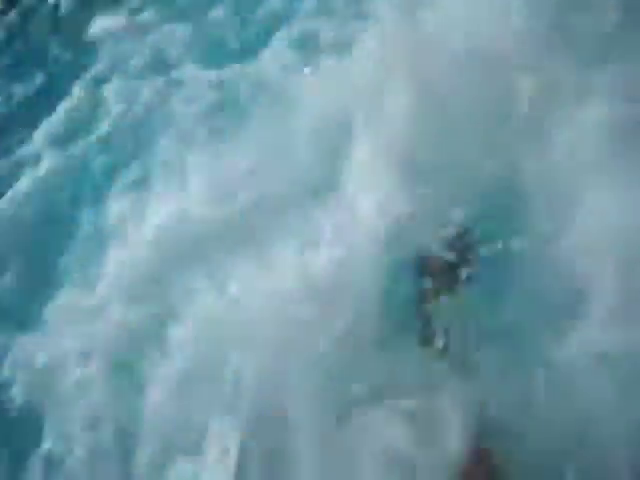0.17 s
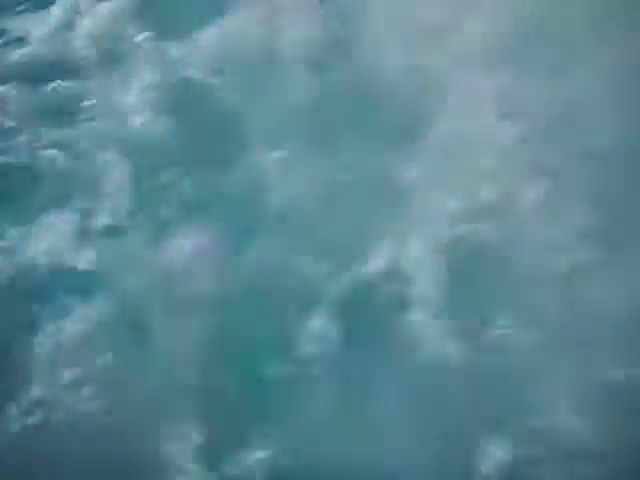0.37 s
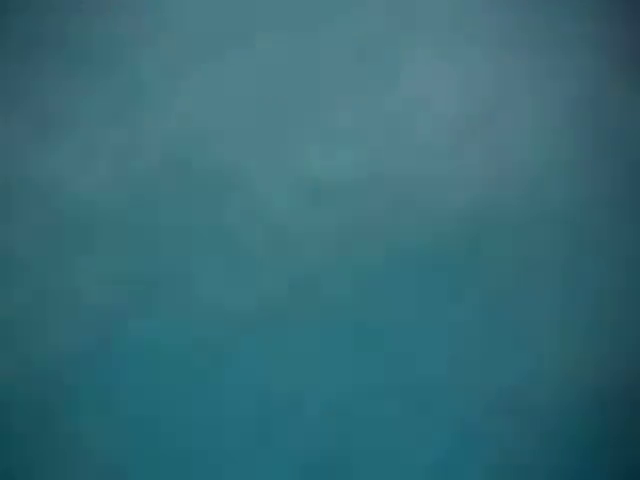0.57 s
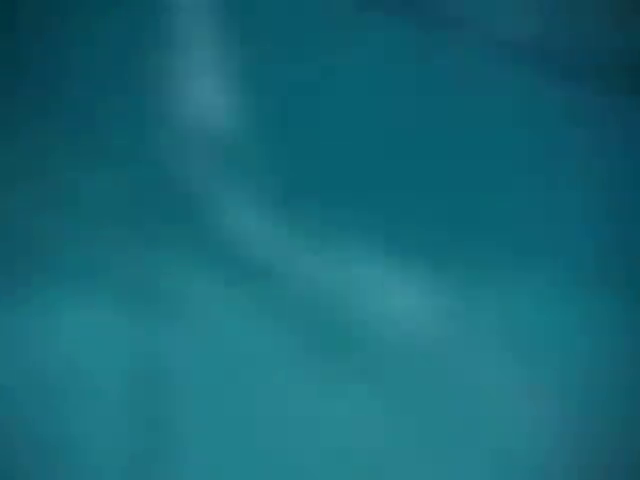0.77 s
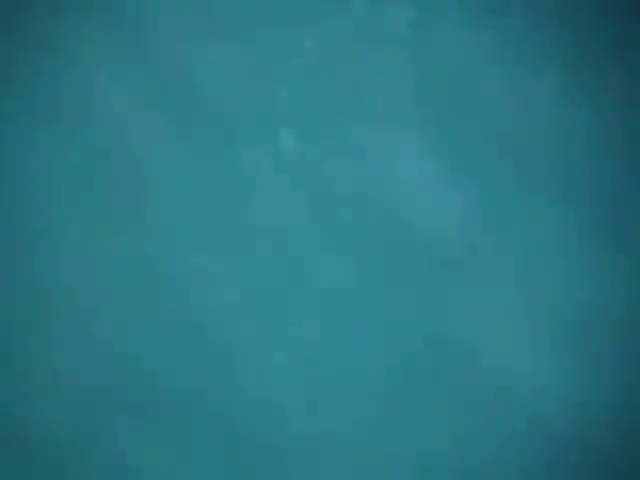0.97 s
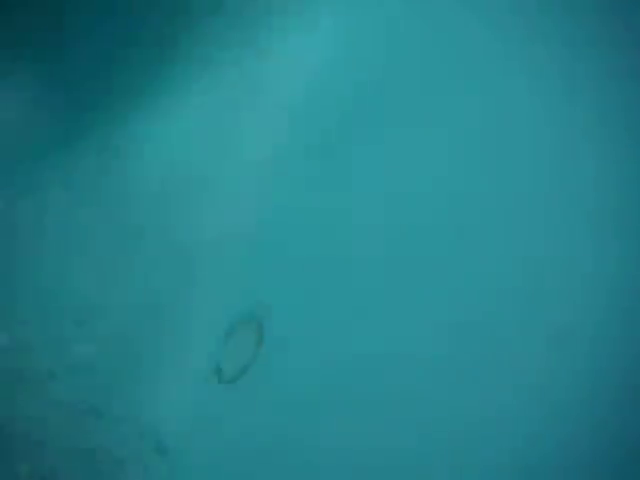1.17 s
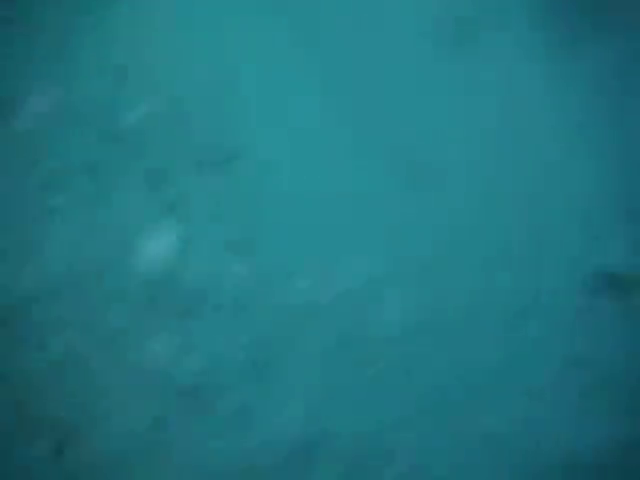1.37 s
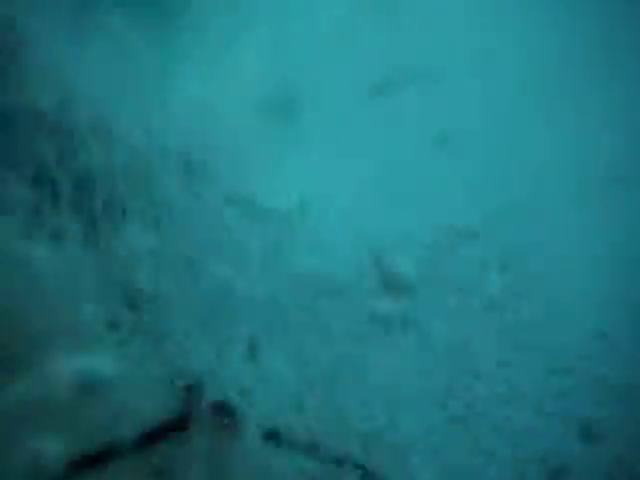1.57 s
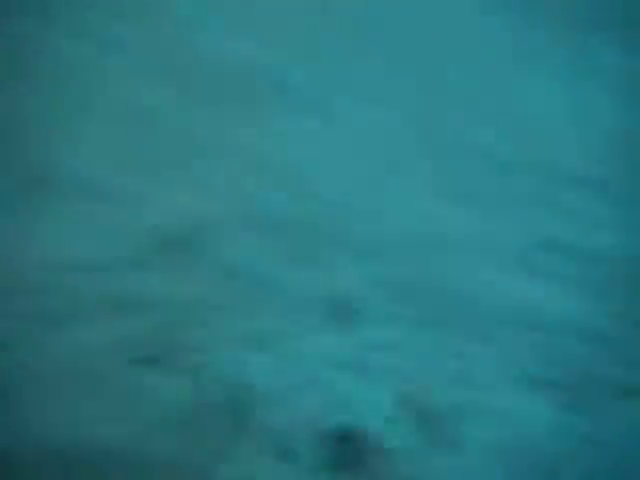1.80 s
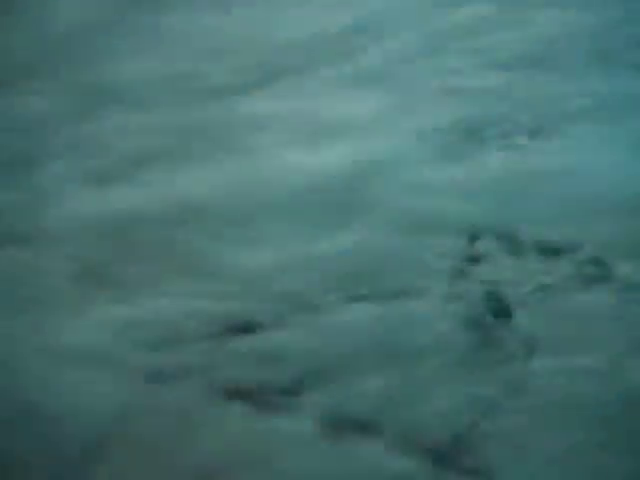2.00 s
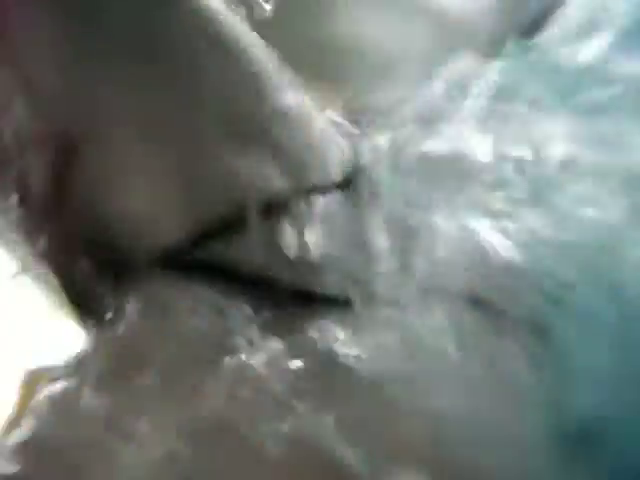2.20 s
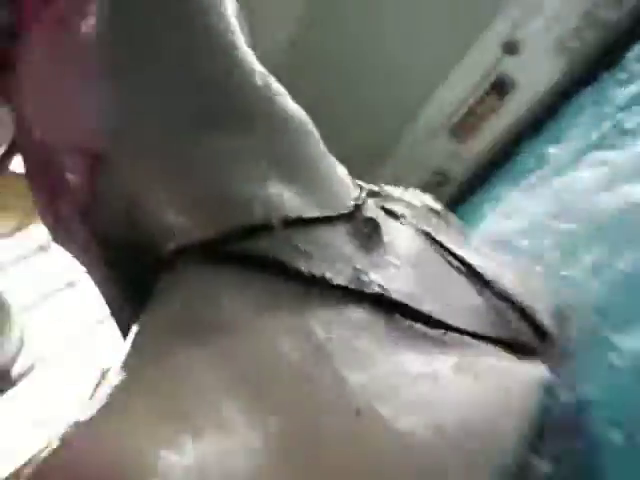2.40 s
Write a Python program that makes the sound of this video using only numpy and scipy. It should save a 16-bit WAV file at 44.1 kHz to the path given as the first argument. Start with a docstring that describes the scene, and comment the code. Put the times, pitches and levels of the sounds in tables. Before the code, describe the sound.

A plunge into a pool heard from a microphone in a waterproof case on the rider: hissing spray, violent clipped water slaps, a low gulp, hushed underwater glugs, then a swirl of bubbles and a soft plop on surfacing.

```python
"""Water slide plunge

A rider shoots off a water slide into a pool, holding a microphone in a waterproof case.
Spray and bubbles are swarms of short rising sines over noise; slaps are noise bursts that overload
the microphone, and the water closes over it with a deep gulp. Under water, noise and ringing sines gurgle
and tick, a cloud of bubbles sweeps past, and the case surfaces with a plop."""
import sys
import numpy as np
from scipy import signal
from scipy.fft import rfft, irfft, next_fast_len
from scipy.io import wavfile
from scipy.ndimage import uniform_filter1d, map_coordinates

SR = 44100
rng = np.random.default_rng(int(sys.argv[2]) if len(sys.argv) > 2 else 0)


def pcm_store(signal):
    """Save signal as 16-bit PCM."""
    levels = np.round(np.clip(np.atleast_2d(signal), -1, 1) * 32767)
    wavfile.write(sys.argv[1], SR, levels.astype(np.int16).T)


N = 108045

# Colours are spectral shapes: (frequency [Hz], relative density [dB per Hz]).
# Levels are those reaching the microphone, before it overloads.

# swings of pressure as the case enters and leaves the water:
# (middle [s], level [dB], pitch [Hz], width [s])
PRESSURE_HEAVES = [(0.444, -6.5, 33.7, 0.011), (0.559, -7.5, 56, 0.0078), (0.777, -9.5, 13.7, 0.026),
                   (2.174, -2.5, 23.6, 0.014)]
# colour of the air pocket collapsing over the case: (frequency [Hz], density [dB])
GULP_COLOUR = [(25, 1.5), (70, -2.5), (240, -3), (400, -10.5), (700, -22.5), (1500, -20.5), (2200, -35),
               (5000, -46)]
GULP_START_S, GULP_LENGTH_S, GULP_T60_S, GULP_DB = 0.753, 0.029, 0.049, -8

# water slapping the case: (start [s], length [s], hiss [dB], body [dB])
WATER_SLAPS = [(0.4157, 0.0025, -7.5, -3.5), (0.4474, 0.012, -16.5, -32.5), (0.46, 0.0099, -5.5, -18),
               (0.47, 0.006, -20, -9), (0.488, 0.012, -18, -24), (0.511, 0.0015, -14, -25),
               (0.542, 0.0028, -3, -16.5), (0.55, 0.0075, -6.5, -14.5), (0.574, 0.0086, -22.5, -22.5),
               (0.6463, 0.0048, -16, -51), (0.679, 0.0066, -21.5, -19.5), (0.695, 0.0034, -30, -24),
               (0.722, 0.0089, -24, -35), (0.747, .012, -26, -15.5), (0.769, 0.012, -33, -17),
               (1.663, 0.0041, -35, -28.5), (1.763, 0.0028, -31.5, -36), (1.833, 0.0019, -22, -32),
               (2.058, 0.0038, -31, -38), (2.2025, 0.009, -50, -24.5)]
# hollow body of a slap: (frequency [Hz], density [dB])
SLAP_BODY_COLOUR = [(40, 0.5), (150, 8), (400, -10.5), (850, -5), (1250, -8.5), (1800, -13), (2500, -18),
                    (5000, -29.5)]
SLAP_T60_S, SLAP_CRACKLE_DB = 0.02, 2.5
BURST_RISE_S = 0.00024  # time constant of every burst's onset

# spray and fizz: (time [s], level [dB])
SPRAY_LEVEL = [(0, -25.5), (.14, -20), (.35, -19), (.44, -25.5), (.53, -23.5), (.62, -32), (.73, -27.5),
               (.83, -46.5), (1.06, -44.5), (1.15, -47.5), (1.26, -57.5), (1.48, -52), (1.64, -47.5),
               (1.81, -39), (1.93, -30.5), (2.04, -34), (2.17, -43), (2.28, -56)]
# spray in the air: (frequency [Hz], density [dB])
SPRAY_COLOUR = [(500, -36), (1300, -13.5), (2000, -7.5), (2800, -3), (3600, -0.5), (4300, -3.5), (5000, -4),
                (5600, -5), (6500, -11)]
# fizz under water: (frequency [Hz], density [dB])
FIZZ_COLOUR = [(500, -29.5), (1300, -15.5), (2050, -5), (2600, -4.5), (3350, -1.5), (4200, -5.5),
               (5000, -4.5), (5500, 2), (6000, -7.5), (6500, -19)]

# single bubbles and drops ringing at the case: (start [s], peak [dB], starting pitch [Hz], t60 [s])
SMALL_BUBBLES = [(.4175, -1, 764, 0.015), (0.42, 1.5, 3020, 0.013), (.468, -14, 1000, .016),
                 (.495, -8.5, 2590, 0.015), (.5445, -14, 1290, 0.017), (0.5649, -1.5, 1105, 0.0076),
                 (.574, -13, 950, 0.028), (.6418, -6.5, 3370, 0.0038), (0.647, 7, 3800, 0.0044),
                 (0.6661, 0, 3540, 0.0096), (.681, 1, 840, 0.0075), (.6885, -3.5, 720, 0.0072),
                 (0.6899, 2, 3110, 0.0025), (.6923, -2.5, 575, 0.032), (0.7078, -12, 3240, 0.017),
                 (0.8863, -21.5, 2680, 0.0045), (1.0349, -19, 3390, 0.0091), (1.1127, -25.5, 1190, 0.0073),
                 (1.6635, -21, 1165, 0.008), (1.3537, -31.5, 4160, 0.018), (1.4604, -38, 4930, 0.018),
                 (1.499, -35.5, 724, 0.014), (1.5672, -29, 2210, 0.009), (1.62, -23.5, 1600, 0.0045),
                 (1.6818, -21, 1212, 0.074), (1.7066, -19.5, 1315, 0.032), (1.707, -16.5, 3440, 0.01),
                 (1.7612, -21.5, 1990, 0.021), (1.768, -30, 517, .035), (1.834, -13.5, 1515, 0.018),
                 (1.846, -17.5, 2940, 0.0091), (1.8895, -14.5, 2630, .011), (1.8952, -17, 1300, .014),
                 (1.911, -17.5, 1380, 0.01), (1.929, -23, 1230, 0.02), (1.9485, -22, 3320, 0.0096),
                 (1.974, -19, 1390, .008), (1.983, -28, 2570, 0.0107), (2.0435, -13.5, 1840, 0.01),
                 (2.054, -18, 2400, 0.013), (2.065, -7.5, 5260, 0.0033), (2.2026, -14, 462, 0.042),
                 (2.207, -23, 1010, 0.017), (2.2382, -27.5, 1670, 0.012), (2.249, -24, 1010, 0.018),
                 (2.258, -26, 1010, 0.022), (2.341, -35, 1760, 0.026), (2.4305, -37.5, 1340, .016)]
BUBBLE_RISE_S, BUBBLE_GLIDE = 0.0001, 0.1  # onset; fractional pitch rise over one t60
BUBBLE_SPLAT_DB = -12.5  # noise relative to the ring
# large pockets of air breaking loose: (start [s], peak [dB], starting pitch [Hz])
GLUGS = [(.756, -16, 384), (.769, -11.5, 245), (.83, -26, 156), (.85, -30.5, 255), (0.896, -27, 430),
         (.943, -27.5, 207), (1.011, -27.5, 246), (1.127, -29.5, 137), (1.36, -31, 119), (1.683, -24, 234),
         (1.718, -18, 181), (1.737, -26.5, 340), (1.75, -22, 270), (1.812, -29, 430), (1.942, -23.5, 146.5)]
GLUG_CYCLES, GLUG_RISE_S, GLUG_GLIDE, GLUG_SPLAT_DB = 13, 0.0025, 0.29, -20.5  # cycles in one t60

# churning bubble cloud: (time [s], level [dB])
CHURN_LEVEL = [(.1, -59.5), (.3, -33), (.56, -39), (.63, -51.5), (.77, -29.5), (.84, -45), (1.145, -42),
               (1.27, -56.5), (1.47, -56.5), (1.65, -45), (1.685, -33), (1.87, -40), (1.895, -26),
               (1.97, -30.5), (2.03, -34.5), (2.27, -44), (2.33, -54.5), (2.45, -58)]
# churning bubble cloud: (frequency [Hz], density [dB])
CHURN_COLOUR = [(250, -15.5), (700, -10.5), (950, -4), (1250, -3), (1650, -7), (2050, -5), (2600, -12),
                (4000, -17)]
CHURN_FLUTTER_DB = 1.2

# gurgling wake: (time [s], level [dB])
GURGLE_LEVEL = [(0, -43), (.3, -35), (.42, -33), (.66, -29), (.78, -24), (.88, -30.5), (1.12, -37),
                (1.26, -45), (1.37, -42.5), (1.63, -38.5), (1.72, -30), (1.8, -30), (1.97, -29.5),
                (2.04, -36), (2.15, -36), (2.25, -43.5), (2.32, -54.5), (2.45, -71)]
# gurgling wake: (frequency [Hz], density [dB])
GURGLE_COLOUR = [(30, -18), (70, -3), (120, -2.5), (180, -5), (300, -5.5), (450, -12), (600, -15),
                 (1000, -21.5), (2500, -54)]
GURGLE_SWELL_DB = 1.5
# water pressure on the case, before the surge trim: (time [s], level [dB])
SURGE_LEVEL = [(0, -32.5), (.29, -25), (.44, -8), (.51, -12), (.6, -24), (.78, -13), (.82, -22.5),
               (1.25, -40), (1.9, -23.5), (2.01, -19), (2.11, -24.5), (2.26, -28.5), (2.45, -40.5)]
# water pressure on the case: (frequency [Hz], density [dB])
SURGE_COLOUR = [(8, 3), (22, 2), (45, -3), (85, -11), (130, -46.5), (300, -83), (1000, -95.5)]
SURGE_TRIM_DB = -0.5

# stream running off the slide: (frequency [Hz], density [dB])
STREAM_COLOUR = [(60, -9), (150, -14), (220, 0), (290, -0.5), (400, -0.5), (480, -18.5), (570, -5.5),
                 (770, -13), (890, -4.5), (1150, -23), (1600, -30)]
STREAM_START_DB, STREAM_GROWS_DB_PER_S = -32, 14
STREAM_END_S, STREAM_FALLS_DB_PER_S = 0.39, 46  # starts to fade at the plunge

# blunt buffeting by turbulent water, before smoothing: (start [s], length [s], level [dB])
BUFFETS = [(0.423, 0.051, -15), (0.535, 0.013, -28.5), (1.939, 0.042, -31.5)]
# buffeting: (frequency [Hz], density [dB])
BUFFET_COLOUR = [(30, -8), (80, -1), (120, -1.5), (170, -10.5), (280, -12.5), (450, -36), (1000, -51.5)]
BUFFET_T60_S = 0.061

# hollow drone of the pool: (frequency [Hz], density [dB])
DRONE_COLOUR = [(200, -17.5), (330, -1), (400, -12), (450, 4), (490, -2), (560, -33), (800, -48)]
DRONE_DB, DIVE_S, SURFACE_S, CROSSING_S = -50, 0.89, 2.1, 0.083

# distant wash of the pool: (frequency [Hz], density [dB])
POOL_COLOUR = [(100, 6), (1200, -4.5), (2000, -12.5), (6000, -1)]
POOL_DB = -52.5

# treble loss: (frequency [Hz], gain [dB])
CASE_RESPONSE = [(4900, 0), (5200, -4.5), (5500, -18), (5950, -16), (6300, -33), (6700, -88.5)]
MIC_CLIP, MIC_KNEE, OUTPUT_CLIP = 0.62, 4.5, 0.67  # clip levels: full scale = 1; higher knee is harder
TOP_HZ = 15900


def plunge():
    """The air pocket collapses in large bubbles; pressure swings as the case enters and leaves."""
    pocket = swarm(GULP_COLOUR, rate=600, lo_hz=73.6, hi_hz=710, cycles=15,
                   spread_db=0.5, wash_db=-2.5, size=4000)
    out = amp(GULP_DB) * burst(GULP_START_S, GULP_LENGTH_S, GULP_T60_S) * pocket
    for middle, heave_db, hz, width in PRESSURE_HEAVES:
        t = clock() - middle
        bell = np.exp(-(t / width) ** 2 / 2)
        out = out + amp(heave_db) * bell * np.sin(2 * np.pi * hz * t)
    return out


def slaps():
    """Sheets of water hit the case: a bright spatter of drops and a hollow body of noise."""
    drops = swarm(SPRAY_COLOUR, rate=2800, lo_hz=2518, hi_hz=5460, cycles=18,
                  spread_db=-3.5, wash_db=-2.5, size=600)
    hiss = unit(drops * amp(SLAP_CRACKLE_DB * wobble(500)))
    body = noise(SLAP_BODY_COLOUR)
    out = np.zeros(N)
    for start, length, hiss_db, body_db in WATER_SLAPS:
        slap = amp(hiss_db) * hiss + amp(body_db) * body
        out += burst(start, length, SLAP_T60_S) * slap
    return out


def spray():
    """Dense hissing drops in the air give way to sparser, crackling fizz under water."""
    above = swarm(SPRAY_COLOUR, rate=3000, lo_hz=1500, hi_hz=5600, cycles=26,
                  spread_db=3, wash_db=-3, size=800)
    below = swarm(FIZZ_COLOUR, rate=1000, lo_hz=1500, hi_hz=5600, cycles=17,
                  spread_db=4, wash_db=-5, size=700)
    under = np.interp(clock(), [0.6, 0.8], [0, 1])
    mix = np.sqrt(1 - under) * above + np.sqrt(under) * below  # equal-power crossfade
    return level(SPRAY_LEVEL) * mix * amp(1.2 * wobble(70))


def bubbles():
    """Small bubbles tick sharply; large ones swell into soft glugs, the lower the longer."""
    glugs = [(start, db, hz, GLUG_CYCLES / hz) for start, db, hz in GLUGS]
    ticks = ringing(SMALL_BUBBLES, BUBBLE_RISE_S, BUBBLE_GLIDE, BUBBLE_SPLAT_DB)
    return ticks + ringing(glugs, GLUG_RISE_S, GLUG_GLIDE, GLUG_SPLAT_DB)


def churn():
    """A dense cloud of middle-sized bubbles, damped rising sines, tumbles past the case."""
    cloud = swarm(CHURN_COLOUR, rate=650, lo_hz=835, hi_hz=2900, cycles=15,
                  spread_db=3.6, wash_db=-10, size=1200)
    return level(CHURN_LEVEL) * cloud * amp(CHURN_FLUTTER_DB * wobble(39.26))


def gurgle():
    """Large bubbles in the wake come in swells, over low noise for the slow push of the water."""
    wake = swarm(GURGLE_COLOUR, rate=190, lo_hz=90, hi_hz=566, cycles=14,
                 spread_db=3, wash_db=-4, size=4500)
    swelling = level(GURGLE_LEVEL) * wake * amp(GURGLE_SWELL_DB * wobble(14))
    surge = amp(SURGE_TRIM_DB) * level(SURGE_LEVEL) * noise(SURGE_COLOUR)
    return swelling + surge


def stream():
    """The flow from the slide burbles into the pool, louder as the rider nears it, then fades."""
    flow = swarm(STREAM_COLOUR, rate=300, lo_hz=197.0, hi_hz=1047, cycles=23,
                 spread_db=1, wash_db=-3, size=4000)
    t = clock()
    growth_db = STREAM_GROWS_DB_PER_S * np.minimum(t, STREAM_END_S)
    fall_db = STREAM_FALLS_DB_PER_S * np.maximum(t - STREAM_END_S, 0)
    return flow * amp(STREAM_START_DB + growth_db - fall_db)


def buffets():
    """Eddies thump against the case as low noise with blunted envelopes."""
    thumps = sum(amp(db) * burst(start, length, BUFFET_T60_S) for start, length, db in BUFFETS)
    return noise(BUFFET_COLOUR) * uniform_filter1d(thumps, size=400)  # 9 ms smoothing


def drone():
    """A faint hollow band of noise sounds while the case is submerged."""
    t = clock()
    submerged = np.clip(np.minimum(t - DIVE_S, SURFACE_S - t) / CROSSING_S, 0, 1)
    return amp(DRONE_DB) * submerged * noise(DRONE_COLOUR)


def pool():
    """The wash of distant water is steady coloured noise."""
    return amp(POOL_DB) * noise(POOL_COLOUR)


def swarm(colour, rate, lo_hz, hi_hz, cycles, spread_db, wash_db, size):
    """Random bubbles (rate per second), damped rising sines size samples long, over noise; rms 1."""
    place, pitch, life, luck = rng.random((4, int(rate * N / SR), 1))
    hz = lo_hz * (hi_hz / lo_hz) ** pitch
    t = np.arange(size) / SR
    age = t * hz / (cycles * (0.5 + life))  # 1 = fallen by 60 dB
    strength_db = spread_db * np.minimum(-np.log(1 - luck), np.pi)
    strength = amp(strength_db) * np.sqrt(hz / lo_hz)
    sines = np.sin(2 * np.pi * hz * t * (1 + BUBBLE_GLIDE * age / 2))
    rings = strength * amp(-60 * age) * sines
    where = (place * N).astype(int) + np.arange(size)
    pops = np.bincount(where.ravel(), rings.ravel(), N)[:N]
    return unit(unit(coloured(pops, colour)) + amp(wash_db) * noise(colour))


def ringing(rows, rise_s, glide, splat_db):
    """Each near bubble rings briefly, rising in pitch, with a little low-passed splatter."""
    out = np.zeros(N + SR)
    t = np.arange(SR // 8) / SR
    for start, db, hz, t60 in rows:
        ring = np.sin(2 * np.pi * hz * t * (1 + glide * t / t60 / 2))
        pole = np.exp(-2 * np.pi * hz / SR)
        splat = unit(signal.lfilter([1], [1, -pole], rng.standard_normal(len(t))))
        shape = (1 - np.exp(-t / rise_s)) * amp(-60 * t / t60)
        pop = shape / shape.max() * (ring + amp(splat_db) * splat)
        out[round(start * SR):][:len(t)] += amp(db) * pop
    return out[:N]


def burst(start, length, t60):
    """Envelope with a quick rise, a hold and an exponential decay."""
    t = np.maximum(clock() - start, 0)
    rise = 1 - np.exp(-t / BURST_RISE_S)
    return rise * amp(-60 * np.maximum(t - length, 0) / t60)


def noise(points):
    """Coloured noise of rms 1."""
    return unit(coloured(rng.standard_normal(N), points))


def coloured(x, points):
    """Shape x by (frequency [Hz], gain [dB]) points on a log frequency axis."""
    f, db = np.transpose(points)
    return filtered(x, lambda hz: amp(np.interp(np.log(hz + 1), np.log(f), db)))


def filtered(x, response):
    """Multiply the spectrum of x by a response of frequency."""
    m = next_fast_len(N + 8192)
    gains = response(np.fft.rfftfreq(m, 1 / SR))
    return irfft(rfft(x, m) * gains, m)[:N]


def wobble(rate):
    """A smooth random curve, rate knots a second."""
    return map_coordinates(rng.standard_normal(4096), [clock() * rate + 2], mode="wrap")


def level(rows):
    """Gain per sample from (time [s], level [dB]) rows."""
    return amp(np.interp(clock(), *np.transpose(rows)))


def clock():
    """Time of each sample in seconds."""
    return np.arange(N) / SR


def unit(x):
    """Scale to rms 1."""
    return x / np.sqrt(np.mean(x ** 2) + 1e-20)


def amp(db):
    """Decibels to gain."""
    return 10 ** (np.asarray(db) / 20)


def scene():
    """Everything that reaches the case, summed to one channel."""
    near = plunge() + slaps() + spray() + bubbles()
    water = churn() + gurgle() + stream() + buffets()
    background = drone() + pool()
    return (near + water + background)[None]


def record(dry):
    """The microphone saturates with a rounded knee, the treble is cut, and the tallest peaks clip."""
    overload = np.abs(dry[0] / MIC_CLIP) ** MIC_KNEE
    saturated = dry[0] / (1 + overload) ** (1 / MIC_KNEE)
    dull = coloured(saturated, CASE_RESPONSE)
    clipped = np.clip(dull, -OUTPUT_CLIP, OUTPUT_CLIP)
    return filtered(clipped, lambda hz: hz < TOP_HZ)[None]


dry = scene()
out = record(dry)
pcm_store(out)
```